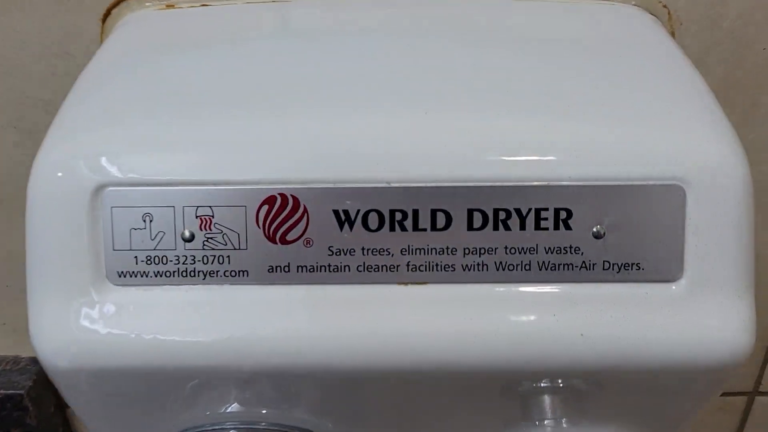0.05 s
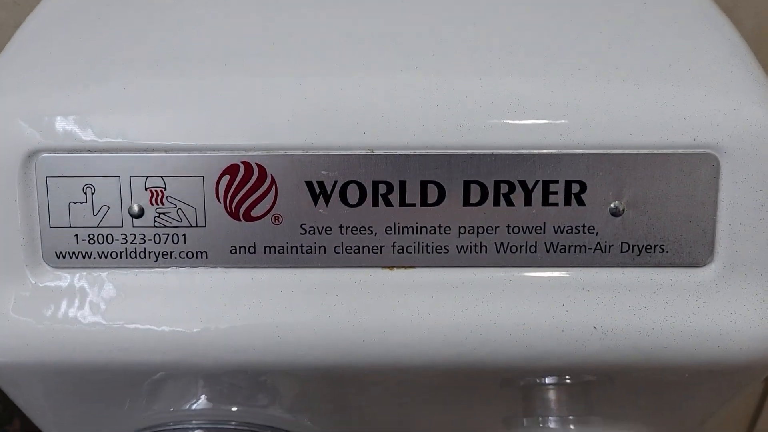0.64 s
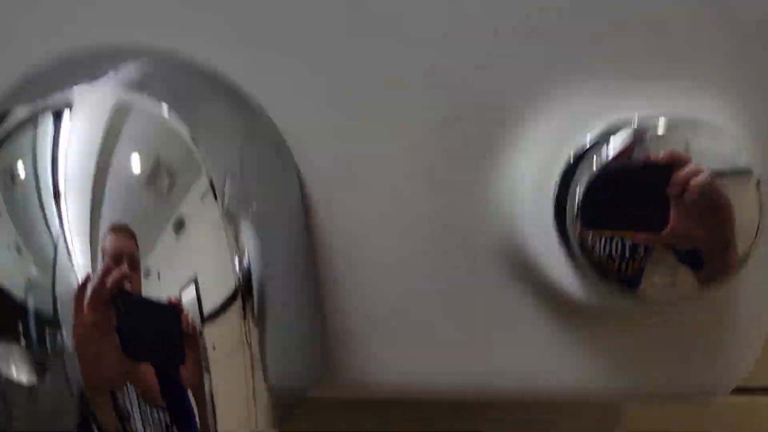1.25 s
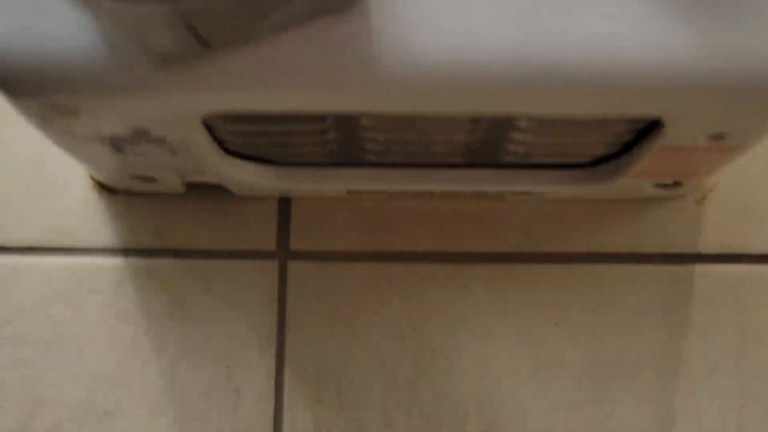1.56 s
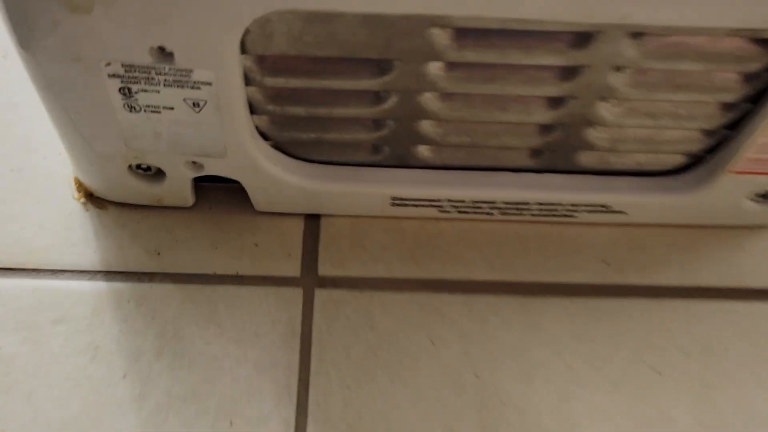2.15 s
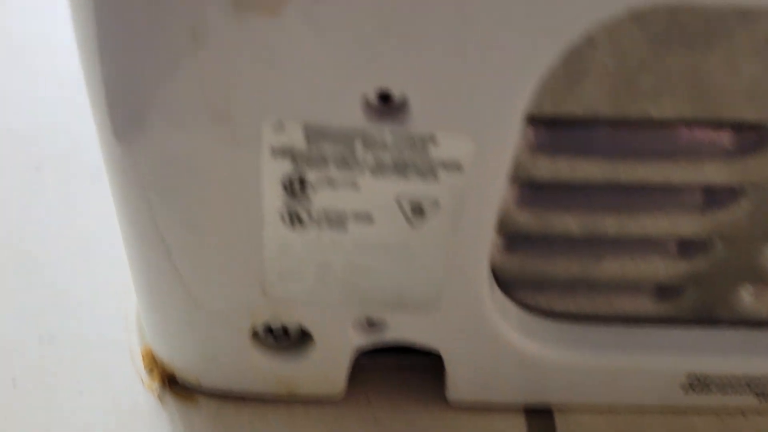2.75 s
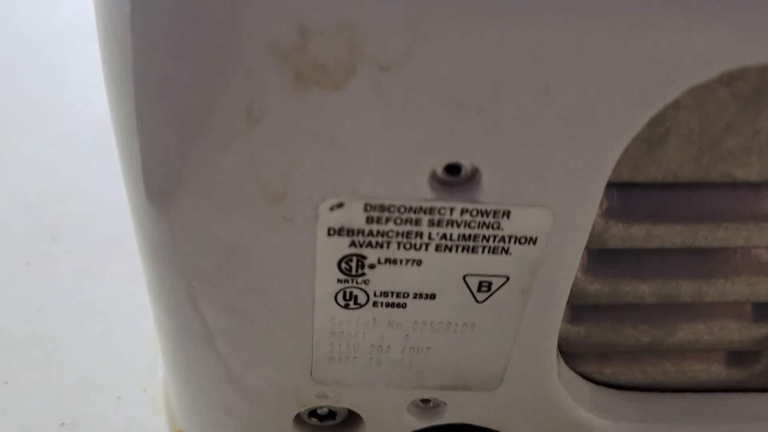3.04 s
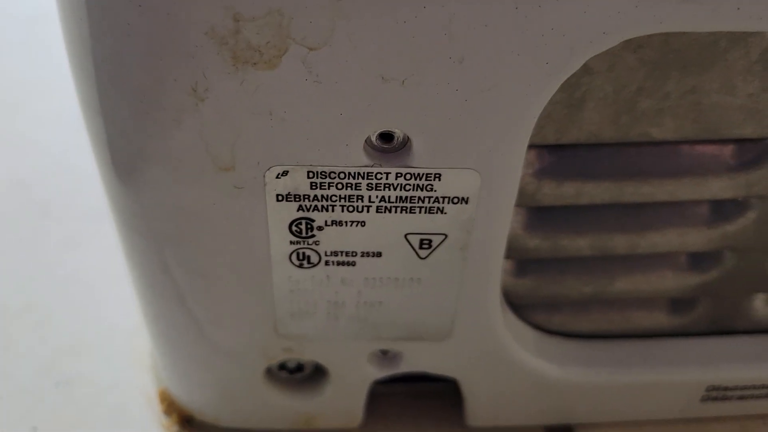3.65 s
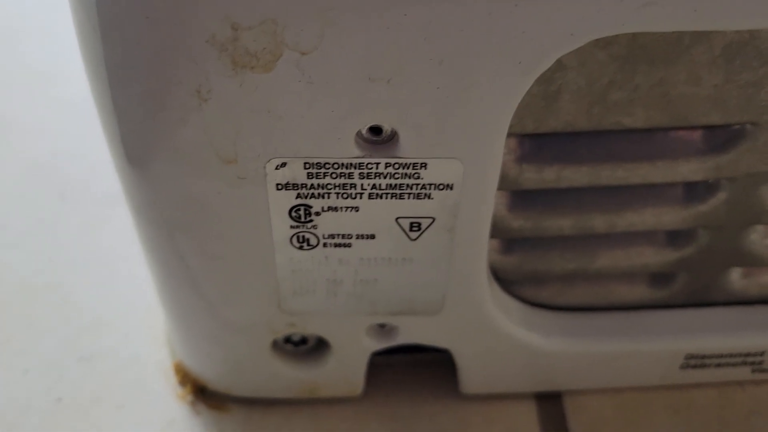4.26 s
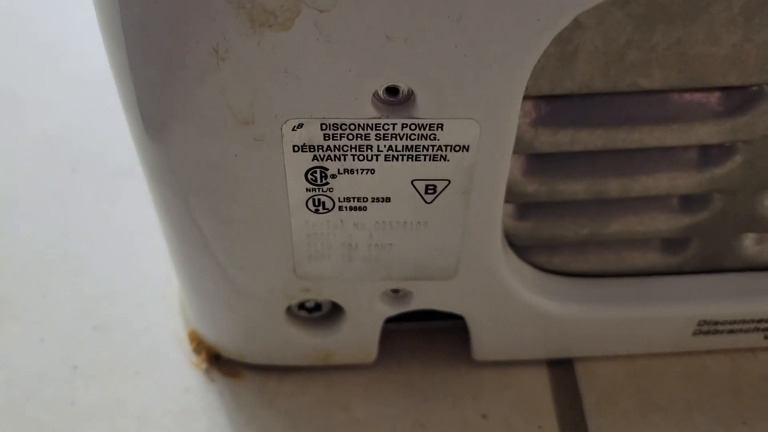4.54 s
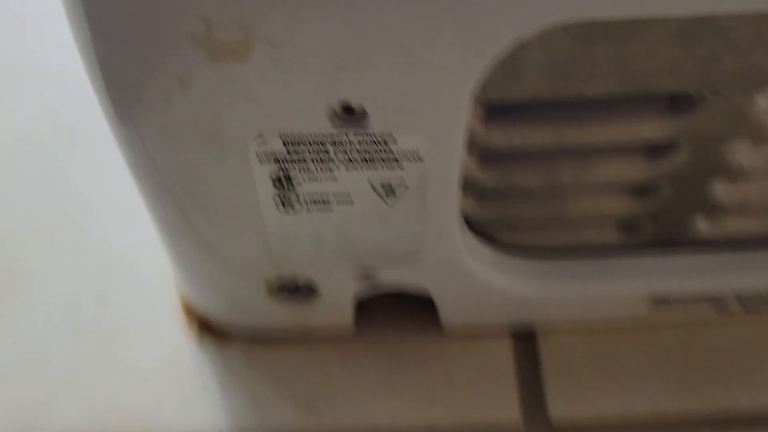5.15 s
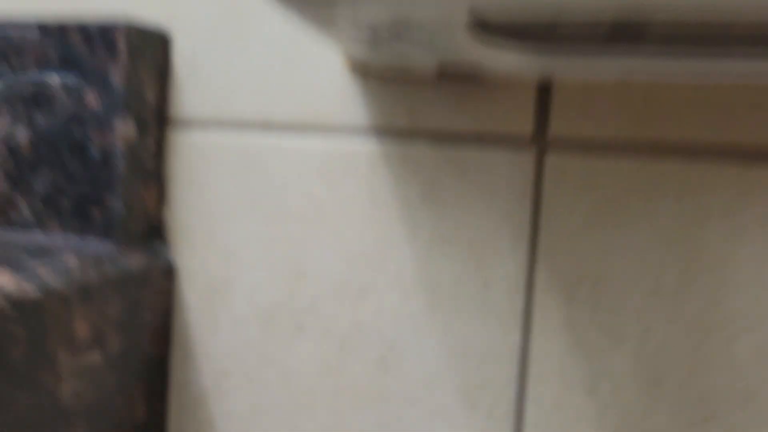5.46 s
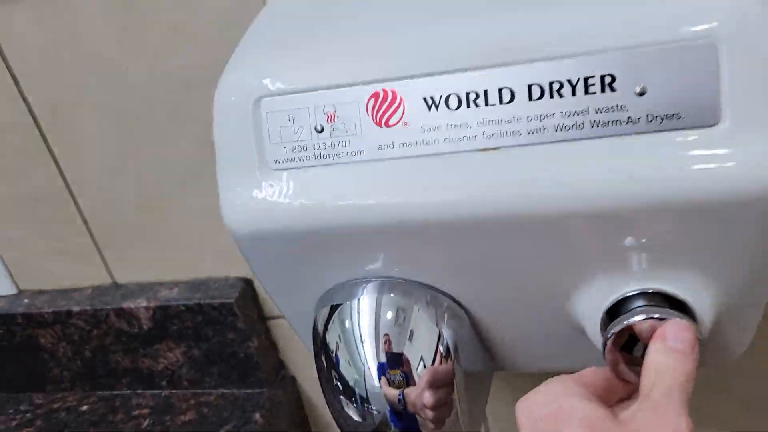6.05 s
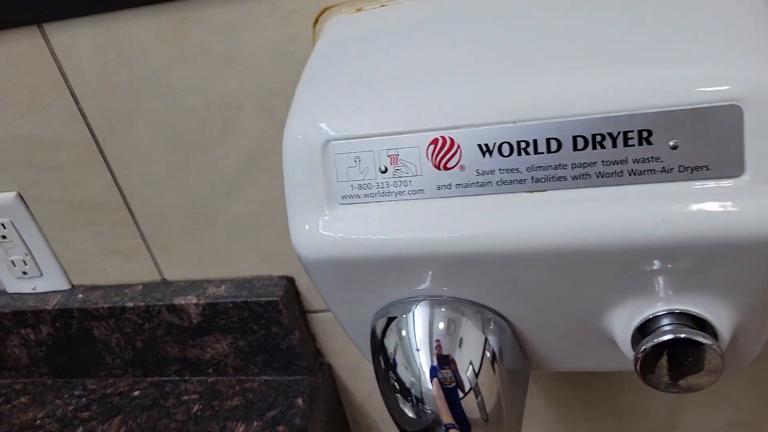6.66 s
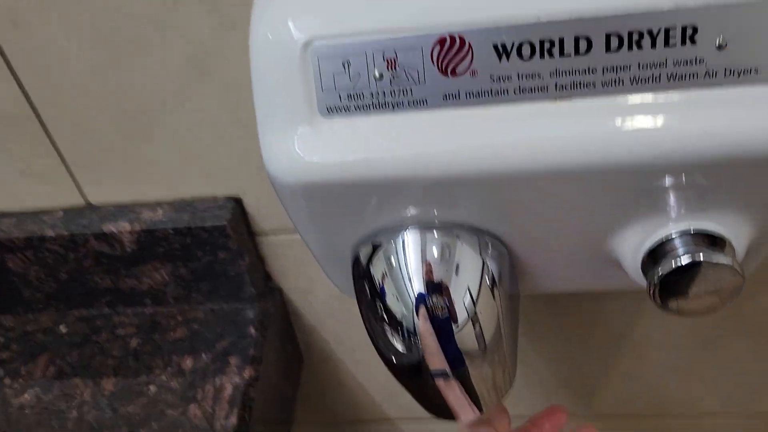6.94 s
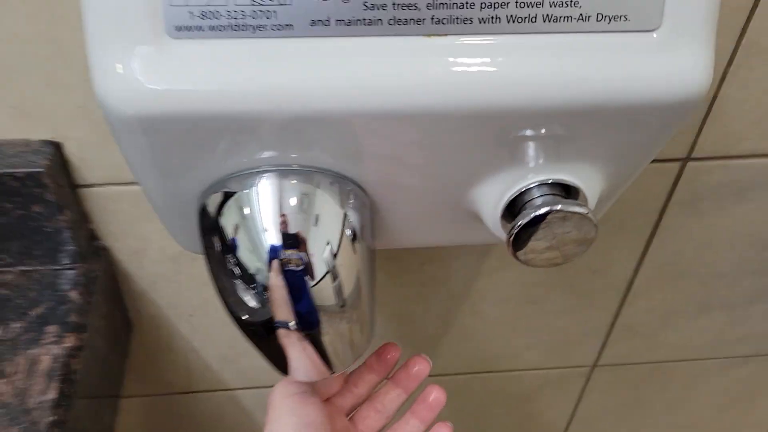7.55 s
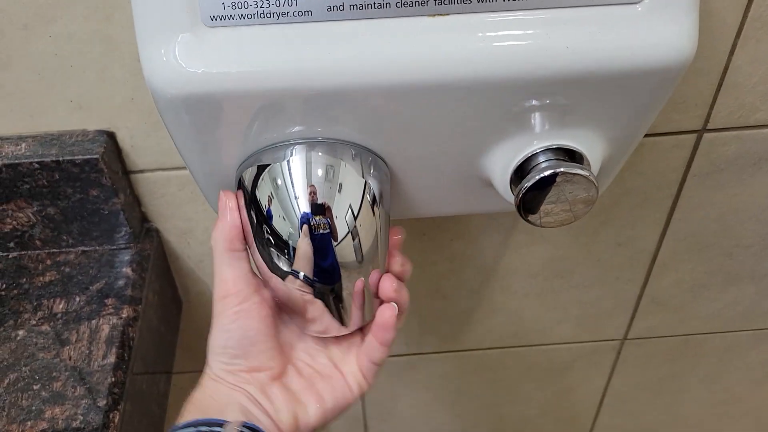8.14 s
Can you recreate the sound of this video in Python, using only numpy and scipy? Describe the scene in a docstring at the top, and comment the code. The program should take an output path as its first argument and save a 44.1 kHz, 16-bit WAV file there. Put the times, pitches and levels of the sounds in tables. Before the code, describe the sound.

A wall-mounted hand dryer starts up close by in a restroom with a short tiled echo. First there is only a low ventilation rumble, faint swishes of fabric and a few shoe scuffs. Then the button clunks and snaps back, a low motor hum sets in, and the airflow swells to a loud, throbbing roar, briefly turning sharper as a hand enters the stream.

```python
"""A wall-mounted hand dryer runs close by in a tiled restroom. Its button clunks in and springs back,
the motor hums and spins up, and the air builds to a loud rush while the shaft throbs against the hum.
Near the end a hand cuts into the jet. Before the dryer starts, clothes rustle and shoes scuff as
someone crouches and stands up. The ventilation drones behind it all."""
import sys
import numpy as np
from scipy import signal
from scipy.fft import rfft, irfft, next_fast_len
from scipy.io import wavfile
from scipy.ndimage import map_coordinates

SR = 44100
rng = np.random.default_rng(int(sys.argv[2]) if len(sys.argv) > 2 else 0)


def inscribe(sig):
    """Save sig as 16-bit PCM at rate SR to the path in sys.argv[1].

    A 1-D sig is mono; a 2-D sig holds one channel per row.
    Samples are clipped to [-1, 1] before scaling.
    """
    pcm = np.round(np.clip(np.atleast_2d(sig).T, -1, 1) * 32767)
    wavfile.write(sys.argv[1], SR, pcm.astype(np.int16))


N = 370440

# How long the tiles echo: (frequency [Hz], time to fade by 60 dB [s])
ECHO_TIMES = [(200, 0.49), (1000, 0.69), (3000, 0.53), (8000, 0.72), (15000, 0.32)]
# The tone colour of each noise: (frequency [Hz], relative level [dB])
VENT_COLOUR = [(18, -17), (30, -3), (45, -9), (70, -2), (100, -2.5), (140, -5.5), (200, -11), (250, -21.5),
               (320, -18), (400, -32.5), (1100, -49.5), (3000, -42.5), (8000, -67.5), (15000, -61)]  # ventilation rumble
RUB_COLOUR = [(200, -1), (420, -2.5), (800, -2.5), (1300, 0.5), (1900, 0), (3000, -26)]  # low rub of fabric
SWISH_COLOUR = [(880, -10), (1500, -24), (1900, -2), (2960, 0), (3820, -6.5), (6640, -7), (8170, -12.5),
                (11100, -14), (14000, -6), (15800, -13)]  # bright swish of fabric
KNOCK_COLOUR = [(60, 0.5), (220, 3), (600, -5.5), (950, -0.5), (1400, -21), (3000, -45)]  # knock on the housing
CLACK_COLOUR = [(700, -25), (1300, -4), (1650, -2.5), (2000, 1), (2500, -5), (3000, -4.5), (3700, -5),
                (4700, -16.5), (6500, -24), (10000, -72)]  # clack of the button's plunger
TICK_COLOUR = [(3000, -11), (6500, -11), (9500, 1.5), (11000, -10), (13000, 3.5), (16000, -4)]  # tick of the switch
SHUDDER_COLOUR = [(25, -7), (50, -13), (72, 4.5), (130, 0.5), (300, -32), (1000, -68)]  # shaking housing
HAND_COLOUR = [(1500, -30), (2400, -7), (2750, 0), (3100, -6), (3700, -20), (7000, -30), (15000, -40)]  # air over the edge of a hand
ROAR_COLOUR = [(20, -35), (50, -23), (85, -3.5), (150, -6), (250, -0.5), (400, 1), (650, -3), (1000, 1),
               (1400, -9), (2100, -7), (2850, -6), (3400, -16), (5000, -27), (8000, -58)]  # churning air
HISS_COLOUR = [(2200, -27), (3300, -3), (3800, -1), (4700, -5), (6300, -3), (7800, -10), (9600, -9.5),
               (11200, -13.5), (13000, -9), (15800, -9.5)]  # air at the nozzle
# Pitches that a hollow space boosts or weakens: (frequency [Hz], width [Hz], boost [dB])
VENT_RESONANCES = [(61.7, 7.4, 8.5), (91, 4.1, -0.5), (172.5, 15.5, -16.5), (183, 8.2, 11), (207, 12, 5.5),
                   (600, 60, 6.5), (856, 146, 12.5), (1370, 200, 11), (1587, 59, 11), (2260, 300, 3.5),
                   (5760, 610, 9)]  # ventilation ducts
DRYER_RESONANCES = [(170, 28, -3), (204, 12, 2), (245, 44, 5.5), (302, 9.1, 2), (338, 23, 0.5),
                    (375, 20, 5.5), (400, 11, -5.5), (519, 19, 3.5), (594, 50, -2), (706, 37, 5),
                    (749, 20, 4.5), (780, 22, 0), (820, 24, -1.5), (882, 23, -3), (1084, 47, 1.5),
                    (1151, 30, 4), (1172, 41, 5.5), (1230, 47, -2), (1304, 43, 4), (1390, 39, -1),
                    (1478, 72, 6.5), (1765, 50, 7), (2270, 32, -1), (2550, 15, -11), (2480, 22, 5),
                    (2720, 62, 5.5), (4376, 17, 6.5), (5570, 31, 6)]  # fan casing, nozzle and room corner
# How alike left and right sound: (frequency [Hz], likeness [0 to 1])
VENT_LIKENESS = [(30, 0.45), (60, 0.94), (240, 0.8), (950, 0), (3800, 0)]
DRYER_LIKENESS = [(30, 0.34), (70, 0.59), (200, 1), (500, 0.42), (1200, 0.42), (2400, 0.4), (4500, 0.15),
                  (12000, 0.072)]
CLOTH_LIKENESS = [(400, 0.14), (3000, 0.04), (10000, 0.056)]
# Which side the dryer is louder on: (frequency [Hz], left minus right [dB])
DRYER_BALANCE = [(60, 10), (110, 0.5), (200, -6), (380, -1.5), (700, -6), (1290, -4.5), (2380, -5),
                 (4400, 3.5), (8120, -7), (15000, 0)]
# Clothes moving during the crouch and the standing up:
# (time [s], swish [dB], rub [dB], rise [s], hold [s], fall [s], left minus right [dB])
CLOTH_STROKES = [(.88, -67, -72, .08, 0.13, .2, -1), (1.03, -52.5, -61, 0.17, .76, 0.58, -1.5),
                 (1.38, -51.5, -52, .18, .06, .18, -0.5), (2.3, -69.5, -86, 0.18, 0.47, .55, -2),
                 (5.29, -61.5, -68, .16, .76, 0.14, -1.5), (5.518, -64.5, -55, .04, 0.24, 0.32, 0.5)]
# Short noises: (time [s], level [dB], frequency [Hz], width [octaves], length [s])
SHOE_SCUFFS = [(.859, -51, 3000, 0.66, .005), (.905, -55, 2180, 0.28, .006),
               (1.049, -39, 2270, 0.29, 0.017), (1.081, -40.5, 2130, 0.24, 0.017),
               (2.3, -69, 5000, .9, 0.012), (3.076, -59.5, 1575, 0.42, 0.024),
               (3.13, -71, 1250, 0.41, 0.02), (4.6, -67, 396, 0.66, 0.13), (5.52, -48.5, 500, 0.28, 0.03),
               (5.543, -42.5, 1600, 0.76, 0.0056), (5.58, -55.5, 2980, .15, 0.14),
               (5.66, -54.5, 1210, 0.12, 0.12), (5.768, -44.5, 348, 0.74, 0.012),
               (5.99, -39.5, 118, 0.47, .1)]  # scuffs, squeaks and soft steps
BUTTON_NOISES = [(6.19, -33, 170, 0.67, .02), (6.248, -31, 990, 0.33, 0.007),
                 (6.271, -24, 3160, 0.093, 0.014), (6.283, -32.5, 4170, 1.3, 0.021),
                 (6.415, -29, 1610, .22, 0.043), (6.425, -29.5, 950, .4, .025),
                 (6.451, -18.5, 906, 0.11, 0.01), (6.468, -24, 2330, 0.28, 0.027)]  # a low thud on pressing, short scrapes, a knock and crack on release
# Parts of the button hitting each other: (time [s], knock [dB], clack [dB], tick [dB])
BUTTON_HITS = [(6.073, -27, -19.5, -44), (6.08, -27.5, -19.5, -44), (6.111, -24, -36, -60),
               (6.229, -41, -48, -37.5), (6.241, -30.5, -34, -36.5), (6.276, -22.5, -19.5, -33.5),
               (6.445, -17, -21.5, -38.5), (6.455, -24.5, -17.5, -41), (6.472, -20, -27.5, -48),
               (6.506, -30, -35, -30.5)]
# The steel cover's ringing tones: (frequency [Hz], relative level [dB], time to fade by 60 dB [s])
COVER_TONES = [(230, -7, 0.48), (327, -9.5, 0.39), (562.7, -5.5, 0.38), (619, -7, .35), (945, -5, 0.2),
               (1150, -13.5, 0.49), (1375, -11, 0.2), (1675, -5, .5), (1697, -6.5, 0.36), (2170, -7, 0.19),
               (2493, 0.5, 0.16), (2550, -10, 0.21), (2920, -14, .2), (3350, -9, .33), (3394, -10, .36),
               (3720, -11, 0.13), (4010, -7, 0.17)]
# Tones of the unbalanced shaft and the fan blades: (frequency [times shaft speed], level [dB])
SHAFT_TONES = [(1, -32.5), (2, -37), (3, -45), (6, -42.5), (12, -45), (18, -54), (20, -45)]
# Sounds that swell and fade: (time [s], level [dB], rise [s], hold [s], fall [s])
HAND_SWELLS = [(7.956, -27.5, 0.069, 0.13, 0.49), (8.132, -25, 0.051, 0.013, 0.041)]  # a hand cuts into the jet
SHAKE_SWELL = (6.5, -28, 0.8, .27, .65)  # the housing shakes as the motor speeds up
# The housing booms as the shaft nears the hum's pitch: (time [s], boost [dB], rise [s], hold [s], fall [s])
BOOM_SWELL = (6.96, 10.4, 0.2, 0.22, 0.12)

MAINS_HZ, TOP_HZ = 60, 15850
SWITCH_ON_S, FULL_SPEED_HZ, SPIN_UP_S = 6.25, 124.8, 0.413
HUM_START_DB, HUM_RUN_DB, HUM_RISE_S, HUM_FALL_S = -15.5, -30, 0.024, 0.27
ROAR_DB, ROAR_BUILD_S, ROAR_POWER = -18.5, 0.32, 2.1  # strength follows the airflow raised to this power
HISS_DB, HISS_BUILD_S, HISS_POWER = -28, 0.44, 1.98
SIDES = np.array([[0.5], [-0.5]])  # shares a difference between left and right


def amp(db):
    """Turn decibels into a number to multiply by."""
    return 10 ** (np.asarray(db) / 20)


def clock():
    """The time of every sample, in seconds."""
    return np.arange(N) / SR


def running_time():
    """Seconds since the motor was switched on."""
    return np.maximum(clock() - SWITCH_ON_S, 0)


def build_up(seconds):
    """A rise from 0 to 1 after switch-on, about two thirds done after the given time."""
    return 1 - np.exp(-running_time() / seconds)


def swell(start, rise, hold, fall):
    """Reach 1 at the start time, hold, then fade; rise and fall are seconds per 20 dB."""
    t = clock()
    return 10 ** (np.minimum(t - start, 0) / rise - np.maximum(t - start - hold, 0) / fall)


def wobble(rate):
    """A smooth random curve through `rate` random points a second."""
    return map_coordinates(rng.standard_normal(int(N * rate / SR) + 4), [clock() * rate])


def along(points, hz):
    """Read between the rows of a (frequency, value) table, on a musical pitch scale."""
    frequencies, values = np.transpose(points)
    return np.interp(np.log(hz + 1), np.log(frequencies + 1), values)


def filtered(x, response):
    """Multiply each frequency in x by response(frequency)."""
    n = x.shape[-1]
    padded = next_fast_len(n + 8192)
    return irfft(rfft(x, padded) * response(np.fft.rfftfreq(padded, 1 / SR)), padded)[..., :n]


def noise(colour_db, likeness, size=N):
    """Stereo noise of average power 1, made of a shared part and a part opposite in each ear."""
    def response(hz):
        angle = np.arccos(np.clip(along(likeness, hz), -1, 1)) / 2
        return amp(colour_db(hz)) * [np.cos(angle), np.sin(angle)]
    shared, opposite = filtered(rng.standard_normal((2, size)), response)
    stereo = np.array([shared + opposite, shared - opposite])
    return stereo / np.sqrt(np.mean(stereo ** 2) + 1e-20)


def coloured(colour, likeness, resonances=(), size=N):
    """Noise that follows a colour table, with a peak or dip at each resonance."""
    boost = lambda hz: sum(db / (1 + (2 * (hz - centre) / width) ** 2) for centre, width, db in resonances)
    return noise(lambda hz: along(colour, hz) + boost(hz), likeness, size)


def add(track, start, sound):
    """Mix a sound into a track at a start time in seconds."""
    part = track[:, round(start * SR):][:, :sound.shape[-1]]
    part += sound[..., :part.shape[-1]]


def short_noises(rows):
    """Play each row as a short burst of noise around one pitch."""
    out = np.zeros((2, N))
    t = np.arange(SR // 2) / SR - 0.25
    for time, db, pitch, octaves, length in rows:
        band = noise(lambda hz: -4.3 * (np.log2((hz + 1) / pitch) / octaves) ** 2, [(1000, 0.2)], len(t))
        add(out, time - 0.25, amp(db) * np.exp(-2 * (t / length) ** 2) * band)
    return out


def placed(x, lead_ms):
    """The dryer's sound reaches the left ear first and has a different colour in each ear."""
    lead = SIDES * lead_ms / 1000
    return filtered(x, lambda hz: amp(SIDES * along(DRYER_BALANCE, hz)) * np.exp(2j * np.pi * hz * lead))


def echo(x):
    """The tiled walls throw sound back, each frequency fading at its own speed."""
    hz, t, spectrum = signal.stft(rng.standard_normal((2, SR // 2)), SR, nperseg=256)
    fade = amp(-60 * t / along(ECHO_TIMES, hz)[:, None])
    tail = signal.istft(spectrum * fade, SR, nperseg=256)[1]
    return signal.fftconvolve(x, tail / np.linalg.norm(tail[0]), axes=1)[:, :x.shape[-1]]


def ventilation():
    """A distant fan drones as it turns and rumbles through its ducts, over an electrical hum."""
    def tone(hz, db, drift):
        level = amp(db + 1.1 * wobble(4.17)) * np.sqrt(2)
        return level * np.sin(2 * np.pi * hz * clock() + drift * wobble(5))
    rumble = amp(-50) * coloured(VENT_COLOUR, VENT_LIKENESS, VENT_RESONANCES)
    return rumble + tone(hz=58.7, db=-49, drift=0.15) + tone(hz=2 * MAINS_HZ, db=-48.5, drift=0.18)


def clothes():
    """Fabric slides over fabric, catching unevenly, and the rustle fades after each stroke."""
    swish_power = rub_power = 0
    for time, swish_db, rub_db, rise, hold, fall, balance_db in CLOTH_STROKES:
        gain = swell(time, rise, hold, fall) * amp(SIDES * balance_db)
        swish_power += (amp(swish_db) * gain) ** 2
        rub_power += (amp(rub_db) * gain) ** 2
    bright = coloured(SWISH_COLOUR, CLOTH_LIKENESS)
    dull = filtered(bright, lambda hz: 1 / (1 + (hz / 7000) ** 6))
    firmness = np.clip(np.sqrt(swish_power) / amp(-52.5), 0.45, 1)  # firmer strokes sound brighter
    swish = np.sqrt(swish_power) * (dull + firmness * (bright - dull))
    rub = np.sqrt(rub_power) * amp(0.98 * wobble(22)) * coloured(RUB_COLOUR, CLOTH_LIKENESS)
    return amp(0.7 * wobble(65)) * (rub + swish)


def shoes():
    """Soles stick and slip as they twist on the floor tiles."""
    scuffs = short_noises(SHOE_SCUFFS)
    return scuffs + amp(-7) * echo(scuffs)


def button():
    """The button thuds, scrapes and cracks; each hit inside knocks, clacks, ticks and rings the cover."""
    out = short_noises(BUTTON_NOISES)
    t = np.arange(SR // 2) / SR
    attack = 1 - np.exp(-t / 0.00056)
    fade = lambda fade_s: amp(-60 * t / fade_s)
    burst = lambda colour, fade_s: coloured(colour, DRYER_LIKENESS, size=len(t)) * fade(fade_s)
    for time, knock_db, clack_db, tick_db in BUTTON_HITS:
        phases = rng.random((len(COVER_TONES), 1, 1)) + 0.3 * rng.random((len(COVER_TONES), 2, 1))
        ring = sum(amp(db) * fade(fade_s) * np.sin(2 * np.pi * (hz * t + phase))
                   for (hz, db, fade_s), phase in zip(COVER_TONES, phases))
        knock = amp(knock_db) * burst(KNOCK_COLOUR, fade_s=0.092)
        clack = amp(clack_db) * burst(CLACK_COLOUR, fade_s=0.091)
        tick = amp(tick_db) * burst(TICK_COLOUR, fade_s=0.1)
        add(out, time, attack * (knock + clack + tick + amp(clack_db - 7.5) * ring))
    return placed(out, lead_ms=0.13) + amp(-4.5) * echo(out)


def housing_shudder():
    """The housing shakes while the fan speeds up."""
    time, db, *shape = SHAKE_SWELL
    return amp(db) * swell(time, *shape) * build_up(HUM_RISE_S) * coloured(SHUDDER_COLOUR, DRYER_LIKENESS)


def hand_in_jet():
    """The jet of air sings and wavers over the edge of a hand."""
    level = sum(amp(db) * swell(time, *shape) for time, db, *shape in HAND_SWELLS)
    return level * amp(wobble(28)) * coloured(HAND_COLOUR, DRYER_LIKENESS)


def motor():
    """The iron hums at twice the mains frequency; the shaft spins up just past that, so the two throb."""
    time, boom_db, *shape = BOOM_SWELL
    hum_db = HUM_START_DB + (HUM_RUN_DB - HUM_START_DB) * build_up(HUM_FALL_S)  # starting current falls
    hum_db += boom_db * swell(time, *shape)
    hum = amp(hum_db) * build_up(HUM_RISE_S) * np.sin(2 * np.pi * 2 * MAINS_HZ * running_time())
    speed = np.tanh(running_time() / SPIN_UP_S)  # 0 to 1: a steady push against the drag of the air
    turns = FULL_SPEED_HZ * np.cumsum(speed) / SR + 0.0077 * wobble(14)
    whine = sum(amp(db + 3 * wobble(4.6)) * np.sin(2 * np.pi * multiple * turns)
                for multiple, db in SHAFT_TONES)
    return np.sqrt(2) * (hum + whine * speed ** 1.2) * np.ones((2, 1))


def blower():
    """Churning air roars through the fan casing and hisses at the nozzle, growing with the flow."""
    swirl_db = wobble(17)
    roar = amp(ROAR_DB + swirl_db) * build_up(ROAR_BUILD_S) ** ROAR_POWER
    roar = roar * coloured(ROAR_COLOUR, DRYER_LIKENESS, DRYER_RESONANCES)
    hiss = amp(HISS_DB + 0.6 * swirl_db + 0.3 * wobble(45)) * build_up(HISS_BUILD_S) ** HISS_POWER
    hiss = hiss * coloured(HISS_COLOUR, DRYER_LIKENESS, DRYER_RESONANCES)
    air = roar + hiss + hand_in_jet()
    return air + housing_shudder() + amp(-9) * echo(air)


def scene():
    """The dryer close by, the person and the ventilation."""
    return placed(blower() + motor(), lead_ms=0.14) + button() + clothes() + shoes() + ventilation()


def record(dry):
    """Cut away the highest treble, above TOP_HZ."""
    return filtered(dry, lambda hz: np.sin(np.pi / 2 * np.clip((TOP_HZ + 150 - hz) / 300, 0, 1)) ** 2)


dry = scene()
out = record(dry)
inscribe(out)
```